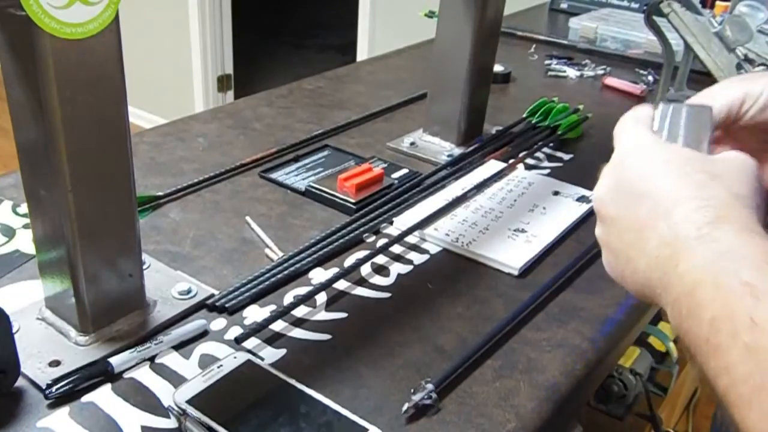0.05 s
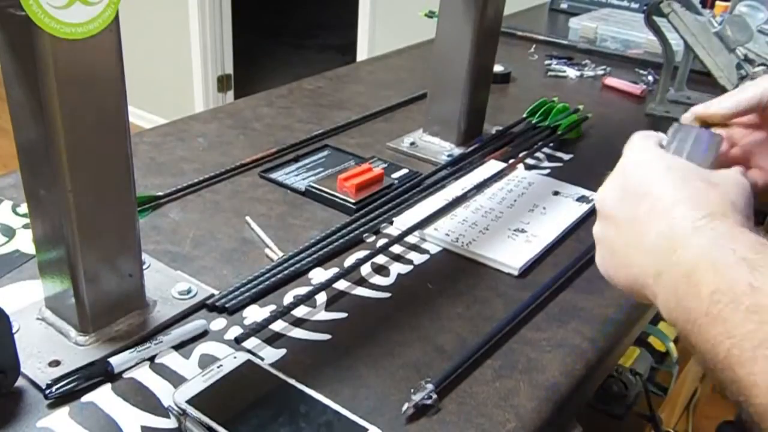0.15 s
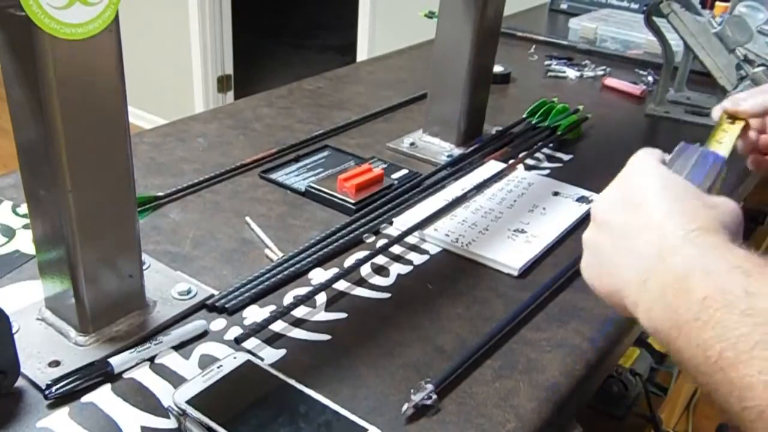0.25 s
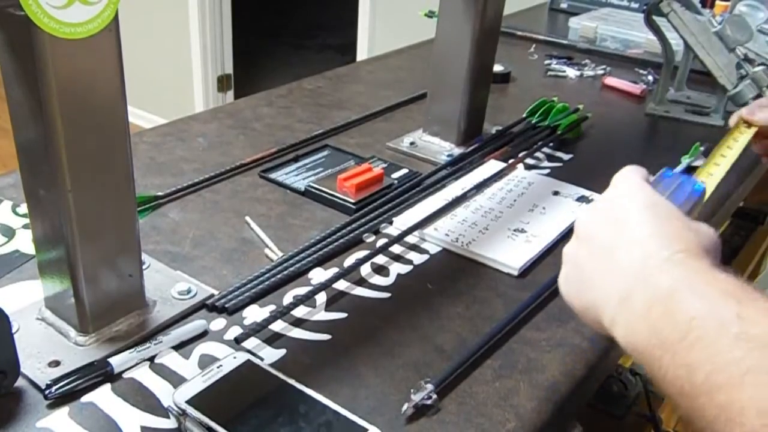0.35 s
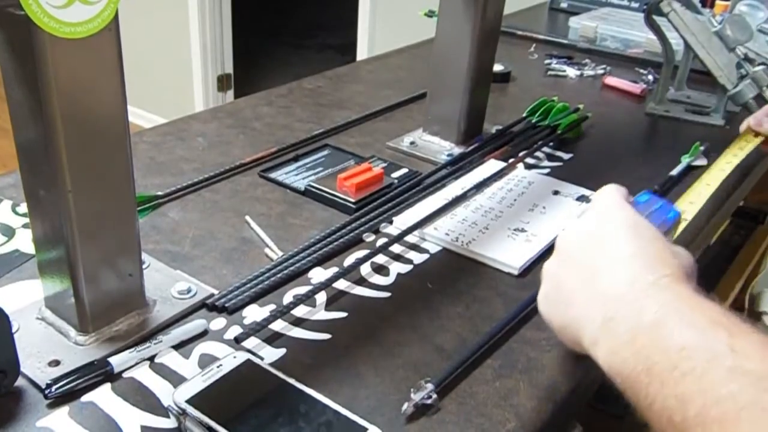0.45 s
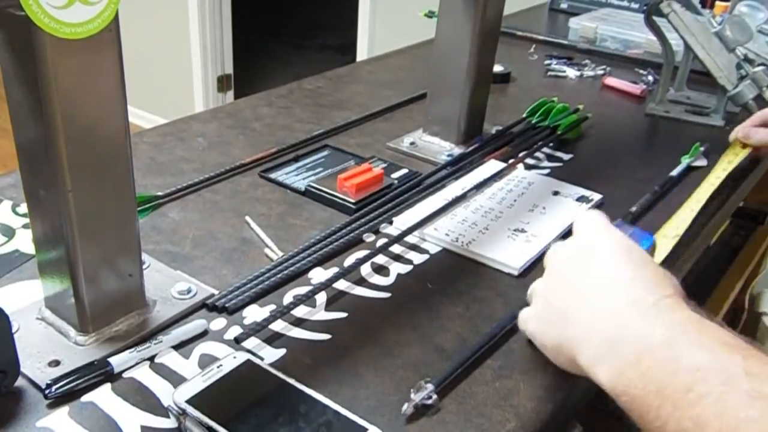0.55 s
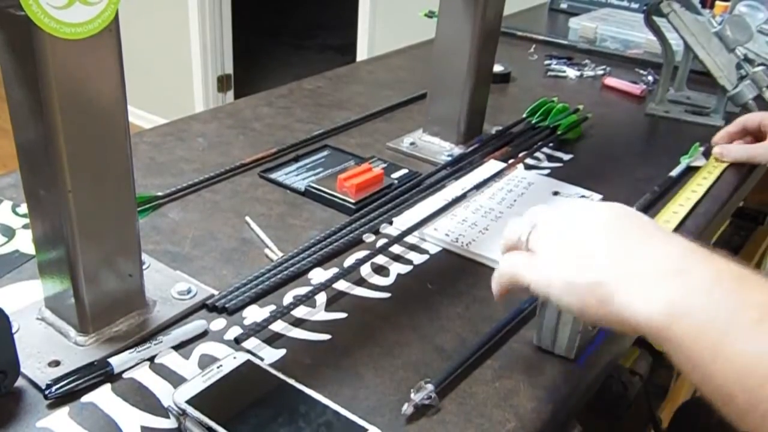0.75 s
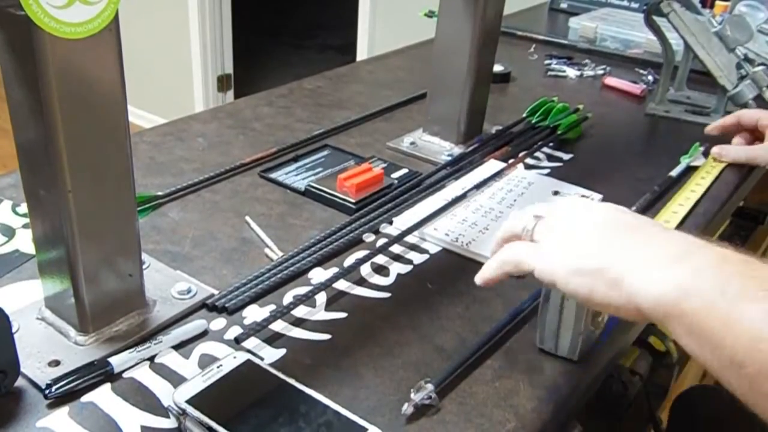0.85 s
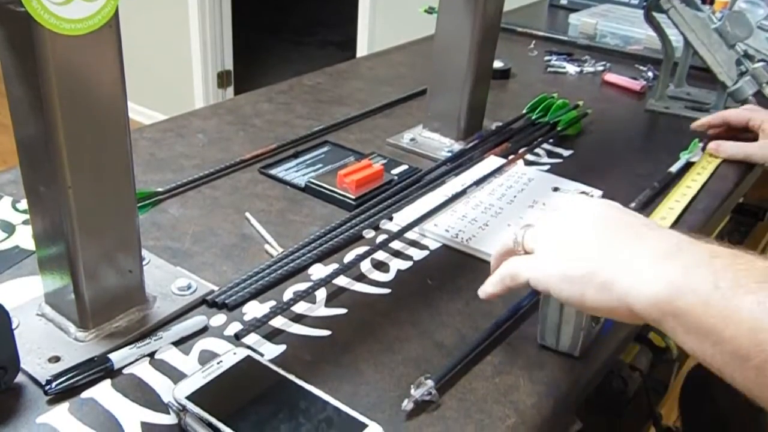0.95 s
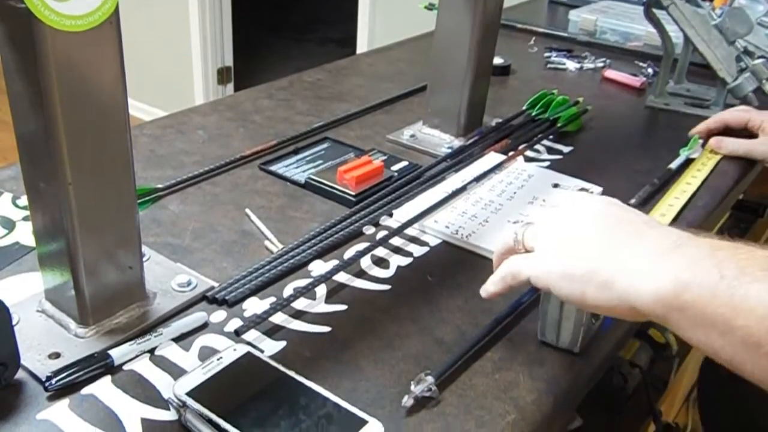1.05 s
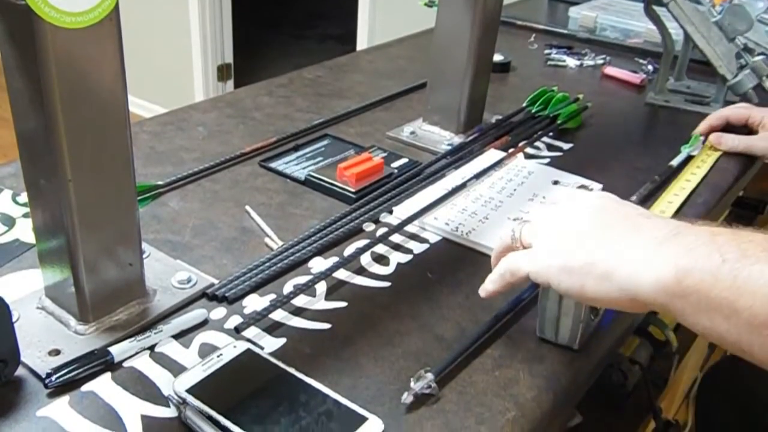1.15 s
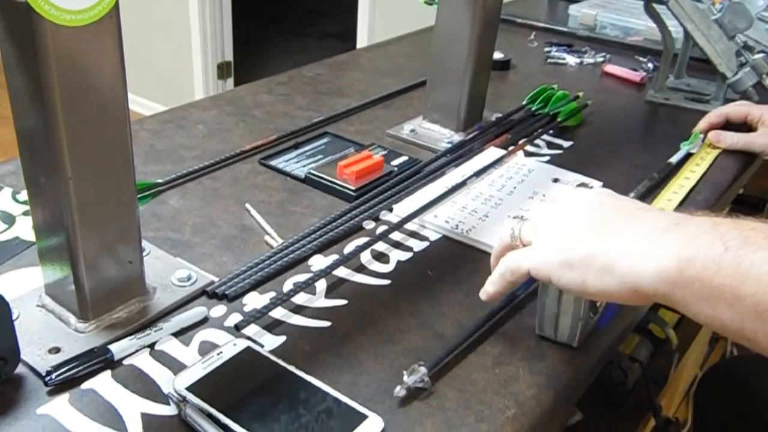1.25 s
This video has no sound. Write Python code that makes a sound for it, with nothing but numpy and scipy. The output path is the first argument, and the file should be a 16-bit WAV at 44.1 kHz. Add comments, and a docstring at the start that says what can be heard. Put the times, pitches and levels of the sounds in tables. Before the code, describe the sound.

A steel tape measure is pulled out and put down with a thump and a rattle.

```python
"""Tape measure on a workbench

A steel tape is pulled out in one rasping stroke, sticking and slipping in the mouth of its case.
The case is set down: the bench thumps and the coil rattles inside. Then the blade slaps down
beside an arrow and chatters. A few light knocks and ticks follow, all close by in a small room."""
import sys
import numpy as np
from scipy import signal
from scipy.fft import rfft, irfft
from scipy.io import wavfile
from scipy.ndimage import uniform_filter1d

SR = 44100
rng = np.random.default_rng(int(sys.argv[2]) if len(sys.argv) > 2 else 0)


def transcribe(u):
    """Save the signal u as a 16-bit wav file named by the first command-line argument.

    u: samples, shape (n,) or (channels, n), limited to [-1, 1]; the rate is SR.
    q: integer samples, one column per channel.
    """
    v = np.clip(np.atleast_2d(u).T, -1, 1)
    q = np.round(v * 32767).astype(np.int16)
    wavfile.write(sys.argv[1], SR, q)


N = 57330
T = np.arange(N) / SR
HZ = np.fft.rfftfreq(N, 1 / SR)

# Tone of the steady background noise: pitch_hz, level_db
BACKGROUND_TONE = [(25, 4), (60, -4), (200, -3.5), (500, -3.5), (1400, -6.5), (3000, -10), (8000, -13.5),
                   (12000, -15.5), (15500, -20)]
# How long the room echoes (every fade_s is the time to drop by 60 dB): pitch_hz, fade_s
ROOM_FADE = [(100, 0.55), (300, 0.36), (1000, 0.3), (3000, 0.37), (8000, 0.28), (15000, 0.15)]
# Tone of the echoes: pitch_hz, level_db
ECHO_TONE = [(100, 7.5), (300, 3), (800, 0), (2500, 0), (8000, -2.5), (15000, -2)]
# How alike scattered sound is on the left and right (1 is identical): pitch_hz, likeness
STEREO_LIKENESS = [(50, 0.93), (300, 0.99), (800, 0.91), (1600, 0.88), (3500, 0.14), (7000, 0.29),
                   (15000, 0.64)]
# The case rubs in the hand and on the bench: time_s, level_db
RUB_LEVEL = [(.18, -59), (.25, -45), (.27, -39), (.36, -46), (.46, -46.5), (.52, -56.5), (.575, -43.5),
             (.72, -44), (.79, -33), (.84, -27.5), (.89, -38.5), (.93, -36), (1.02, -67)]
# Tone of that rubbing: pitch_hz, level_db
RUB_TONE = [(25, -9), (65, -4.5), (85, -14), (115, 1), (145, -14), (190, 3), (300, -5), (500, -6.5),
            (900, -10), (1600, -14.5), (4000, -37)]
# Small ticks of the handled case: start_s, level_db, hold_s, fade_s, tilt_db_per_octave
TICK_HITS = [(.139, -34.5, 0.0024, 0.022, 5), (1.232, -42, 0.0036, 0.024, 0),
             (1.236, -31.5, 0.00074, 0.025, 0), (1.247, -44.5, 0.015, 0.086, 0.5)]
# Tone of a tick: pitch_hz, level_db
TICK_TONE = [(500, -11), (1400, -3), (2500, -7), (4200, 0), (6000, -5), (7500, -2.5), (10500, -1),
             (13000, -12), (15500, -14)]
# The turning spool drones in the case: time_s, level_db
SPOOL_LEVEL = [(.25, -60), (.28, -41), (.305, -34), (.335, -37), (.36, -54), (.4, -64)]
# Notes of that drone: pitch_hz, waver_hz, level_db
SPOOL_NOTES = [(116, 14, -5), (376, 14, 0)]
# The coil rattles in the case: start_s, level_db, hold_s, fade_s
COIL_HITS = [(.576, -36.5, .008, .02), (.584, -23.5, .016, .03), (.603, -17, 0.0037, 0.12),
             (.622, -7.5, 0.0043, 0.019), (.642, -20.5, 0.021, 0.096), (.661, -24, .017, 0.099),
             (.73, -39.5, 0.035, 0.024)]
# Tone of the rattle: pitch_hz, level_db
COIL_TONE = [(800, -34), (2000, -14), (3100, -13.5), (3850, -8), (4050, -2.5), (4300, -9.5), (5300, -1),
             (6200, -3.5), (7600, 2), (9400, -0.5), (11500, -3.5), (12500, -9.5), (15500, -14)]
# The blade slaps down and chatters: start_s, level_db, hold_s, fade_s
BLADE_HITS = [(.766, -7, 0.0057, 0.011), (.772, -13.5, 0.062, 0.29), (.7885, -5.5, .001, 0.0072),
              (.805, -25, .001, .01)]
# Tone of the slaps: pitch_hz, level_db
BLADE_TONE = [(300, -53), (550, -21.5), (950, -12), (1350, -22), (1850, -7.5), (2600, -9.5), (3100, -12),
              (4000, -8), (5500, -6.5), (6800, -7.5), (7900, 0), (9200, -4), (10700, -7), (12000, -15),
              (14400, -16.5), (15500, -37)]
# Notes the steel blade rings with: pitch_hz, level_db, fade_s
BLADE_NOTES = [(1998, 17.5, 0.012), (2410, 0.5, .08), (4240, -1, 0.071), (5052, -23, 0.15),
               (7500, 10, 0.11), (7450, -8, 0.19), (8100, -9, 0.074), (8040, -4.5, 0.136),
               (8080, -4.5, 0.066), (7740, -12.5, 0.1), (9300, 7, .15), (10570, -14, 0.22)]
# The case knocks on the bench: start_s, thump_db, clack_db, clack_pitch_hz, clack_width_octaves
CASE_KNOCKS = [(.259, -49, -34.5, 840, 0.34), (0.441, -38, -28, 750, 0.62), (0.585, -1, -9, 614, 0.89),
               (0.5989, -14, -19.5, 330, 2), (.63, -18, -16, 810, 0.22), (.654, -24, -26, 800, 1.1),
               (.665, -19.5, -21.5, 495, 1), (0.675, -33, -21.5, 750, 0.73), (.876, -22.5, -29, 400, 0.87),
               (0.887, -26, -27, 504, 2.6), (1.138, -56, -35, 428, 0.52), (1.159, -53, -45, 432, 0.51),
               (1.194, -50, -57, 348, 1.4)]
# Notes the bench rings with: pitch_hz, level_db, fade_s
BENCH_NOTES = [(121, -14, 0.19), (191.7, -5.5, 0.15), (205.2, -4, 0.07), (289.5, -4.5, 0.065),
               (302.6, -1.5, 0.12), (365, -13, 0.096), (433, -15.5, 0.2), (492, -19.5, .15),
               (750, -23, 0.37), (826, -15.5, 0.24), (1028, -31, 0.16), (1335, -28, 0.28)]
# The rasp follows the pull on the blade: time_s, level_db
PULL_LEVEL = [(0, -53.5), (.068, -66), (.078, -52), (.115, -45.5), (.13, -58), (.165, -58.5), (.193, -36.5),
              (.203, -28), (.23, -29), (.32, -32), (.41, -29.5), (.455, -30), (.49, -41), (.54, -46.5),
              (.58, -55.5)]
# The turning spool bumps, jolting the rasp: start_s, level_db, hold_s, fade_s
SPOOL_BUMPS = [(.212, -26.5, 0.012, 0.016), (.238, -17.5, 0.0048, 0.01), (.274, -23.5, 0.011, .015),
               (.299, -17, 0.0027, 0.022), (.335, -26, 0.01, 0.05), (.373, -23, 0.012, .025),
               (.406, -38, 0.0033, .015), (.439, -49, 0.0016, 0.011)]
# Tone of the rasp: pitch_hz, level_db
RASP_TONE = [(290, -30.5), (500, -8), (611, -13), (815, -12), (1310, -15), (2040, -7), (2760, -5.5),
             (4070, 0.5), (6640, -6.5), (7560, -3), (10100, -9.5), (11000, -6.5), (12500, -16.5),
             (14800, -20.5), (15500, -26)]


def amp(db):
    """Turns decibels into a number to multiply by."""
    return 10 ** (np.asarray(db) / 20)


def unit(x):
    """Scales a signal to an average (rms) strength of 1."""
    return x / np.sqrt(np.mean(x ** 2) + 1e-20)


def fade(time_s, fade_s):
    """Dies away by 60 dB every fade_s seconds."""
    return np.exp(-np.log(1000) * time_s / fade_s)


def by_pitch(points, hz=HZ):
    """Joins a table's points smoothly along a musical (log) pitch scale."""
    pitches, values = np.transpose(points)
    return np.interp(np.log(hz + 1), np.log(pitches + 1), values)


def level(points):
    """Loudness that follows a table over time, silent before and after."""
    return amp(np.interp(T, *np.transpose(points), left=-np.inf, right=-np.inf))


def convolve(x, response):
    """Lets every sample of x set off the response, cut to the scene's length."""
    return signal.fftconvolve(x, response)[:N]


def colour(x, tone_db):
    """Gives x a tone with a filter of energy 1 that never sounds ahead of its input."""
    log_gain = np.log(amp(tone_db))
    mirrored = np.r_[log_gain, log_gain[-2:0:-1]]
    response = np.fft.ifft(np.exp(np.conj(signal.hilbert(mirrored)))).real[:4096]
    return convolve(x, response / np.linalg.norm(response))


def ring(notes):
    """A struck object rings with several pure notes that die away."""
    return sum(amp(db) * fade(T, fade_s) * np.sin(2 * np.pi * hz * T) for hz, db, fade_s in notes)


def grains(per_s, spread_db):
    """A dense stream of tiny contacts of uneven size, kept at a steady loudness."""
    chance, size, sign = rng.random(N), rng.exponential(1, N), rng.choice([-1, 1], N)
    stream = sign * amp(spread_db * np.minimum(size, 3)) * (chance < per_s / SR)
    return stream / np.sqrt(abs(uniform_filter1d(stream ** 2, size=260)) + 1e-6)


def bursts(hits, rise_s):
    """Loudness of hits that each rise, hold and die away."""
    power = 0
    for start_s, db, hold_s, fade_s in hits:
        rise = np.clip((T - start_s) / rise_s, 0, 1)
        fall = fade(np.maximum(T - start_s - hold_s, 0), fade_s)
        power += (amp(db) * rise * fall) ** 2
    return np.sqrt(power)


def note(start_s, pitch_hz, level_db, rise_s, fade_s):
    """One pure note that swells and dies away."""
    return bursts([(start_s, level_db, 0, fade_s)], rise_s) * np.sin(2 * np.pi * pitch_hz * (T - start_s))


def diffuse(pair):
    """Makes two unrelated signals alike in the bass, as at two close microphones."""
    a, b = rfft(pair)
    likeness = by_pitch(STEREO_LIKENESS)
    mid, side = a * np.sqrt((1 + likeness) / 2), b * np.sqrt((1 - likeness) / 2)
    return irfft([mid + side, mid - side], N)


def room(x, tail_db, early_db=-20, left_lag_ms=0):
    """The direct sound, quick echoes off tools and posts on the bench, and the room's echo tail."""
    taps = diffuse(rng.choice([-1., 1.], (2, N)) * (rng.random((2, N)) < 6000 / SR))
    hz, time_s, bands = signal.stft(taps, SR, nperseg=256)
    bands *= fade(time_s, by_pitch(ROOM_FADE, hz)[:, None])
    tail = signal.istft(bands, SR, nperseg=256)[1][:, :N] * (T > .0047)
    early = taps[:, ::-1] * fade(T, fade_s=.027) * (T > .0005)
    echoes = sum(amp(db) * part / np.linalg.norm(part, axis=1, keepdims=True)
                 for db, part in [(tail_db, tail), (early_db, early)])
    echoes = irfft(rfft(echoes) * amp(by_pitch(ECHO_TONE)), N)[:, :N // 2]
    left = irfft(rfft(x) * np.exp(-2j * np.pi * HZ * left_lag_ms / 1000), N)
    return np.array([left, x]) + np.array([convolve(x, side) for side in echoes])


def background(level_db=-52):
    """Steady room noise and microphone hiss."""
    noise = diffuse(rng.standard_normal((2, N)))
    return amp(level_db) * unit(irfft(rfft(noise) * amp(by_pitch(BACKGROUND_TONE)), N))


def case_rubbing():
    """The case rubs against the hand and the bench with a dull rumble."""
    friction = grains(per_s=3000, spread_db=1.3) * level(RUB_LEVEL)
    return room(colour(friction, by_pitch(RUB_TONE)), tail_db=-20.5)


def finger_ticks():
    """Light ticks as the fingers shift on the case."""
    ticks = 0
    for *hit, tilt in TICK_HITS:
        contacts = grains(per_s=3000, spread_db=6.3) * bursts([hit], rise_s=.00061)
        ticks += colour(contacts, by_pitch(TICK_TONE) + tilt * np.log2(HZ / 5000 + 1e-2))
    return room(ticks, tail_db=-4, early_db=-7, left_lag_ms=.03)


def spool_drone():
    """The turning spool rubs the case, which hums with two low, wavering notes."""
    drone = 0
    for hz, waver_hz, db in SPOOL_NOTES:
        waver = unit(uniform_filter1d(rng.standard_normal(N), size=500))
        drone += amp(db) * np.sin(2 * np.pi * np.cumsum(hz + waver_hz * waver) / SR)
    return room(drone * level(SPOOL_LEVEL), tail_db=-14)


def release_tap():
    """The blade breaks free with a short, hollow tap in the case."""
    return room(note(start_s=.197, pitch_hz=430, level_db=-27, rise_s=.003, fade_s=.06), tail_db=-14)


def bench_hum():
    """The settling case sets one low note of the bench humming."""
    return room(note(start_s=.657, pitch_hz=193, level_db=-19, rise_s=.0027, fade_s=.32), tail_db=-18)


def coil_rattle():
    """The wound steel rattles inside the case as it lands."""
    contacts = grains(per_s=9000, spread_db=3.3) * bursts(COIL_HITS, rise_s=.00066)
    rattle = colour(contacts, by_pitch(COIL_TONE))
    return amp(-.5) * room(rattle, tail_db=-1, early_db=0, left_lag_ms=.035)


def blade_slap(ring_db=-14):
    """The pulled-out blade slaps down and chatters, which makes its thin steel ring."""
    contacts = grains(per_s=12000, spread_db=1.7) * bursts(BLADE_HITS, rise_s=.0014)
    ringing = convolve(contacts, ring(BLADE_NOTES))
    ringing *= np.linalg.norm(contacts) / np.linalg.norm(ringing)
    slaps = colour(contacts, by_pitch(BLADE_TONE))
    return room(slaps + amp(ring_db) * ringing, tail_db=-7, early_db=-6)


def case_knocks(thump_rise_s=.0024, low_cut_hz=95, clack_fade_s=.04, scrape_db=-1.5):
    """Each knock thumps the bench top and draws a short, hollow clack from the plastic case."""
    thump = ring(BENCH_NOTES) * (1 - np.exp(-T / thump_rise_s))
    broad_tone = amp(-16.5) / np.hypot(1, HZ / 2000) * HZ / (HZ + 400)
    thumps, clacks = np.zeros(N), np.zeros(N)
    for start_s, thump_db, clack_db, pitch_hz, octaves in CASE_KNOCKS:
        start = round(start_s * SR)
        thumps[start:] += amp(thump_db) * thump[:N - start]
        force = bursts([(start_s, 0, 0, clack_fade_s)], rise_s=.00019)
        contacts = amp(scrape_db) * grains(per_s=8000, spread_db=5.9) * force
        contacts[start] += np.linalg.norm(force)  # one sharp blow leads the scraping
        hollow_tone = np.exp(-.5 * (np.log2((HZ + 1) / pitch_hz) / octaves) ** 2)
        clack = colour(contacts, 20 * np.log10(hollow_tone + broad_tone + 1e-4))
        clacks += amp(clack_db) * clack * np.linalg.norm(force) / np.linalg.norm(clack)
    thumps = signal.sosfilt(signal.butter(3, low_cut_hz, "highpass", fs=SR, output="sos"), thumps)
    return room(thumps, tail_db=-17) + room(clacks, tail_db=-.5, early_db=.5)


def tape_rasp():
    """The blade sticks and slips through the mouth of the case, jolted now and then by the turning spool."""
    force = np.hypot(level(PULL_LEVEL), bursts(SPOOL_BUMPS, rise_s=.0023))
    slips = grains(per_s=9000, spread_db=4) * force
    return room(colour(slips, by_pitch(RASP_TONE)), tail_db=-4.5, early_db=.5, left_lag_ms=.018)


def scene():
    """All the sounds together, a touch louder on the left."""
    pulling = release_tap() + tape_rasp() + spool_drone()
    setting_down = case_rubbing() + case_knocks() + bench_hum() + coil_rattle() + blade_slap()
    return (pulling + setting_down + finger_ticks() + background()) * amp([[.3], [-.3]])


def record(dry):
    """Clips peaks at full scale, then removes the treble above 15750 Hz."""
    treble_cut = signal.firwin(511, 15750, window=("kaiser", 9), fs=SR)
    return signal.oaconvolve(np.clip(dry, -1, 1), treble_cut[None], "same")


dry = scene()
out = record(dry)
transcribe(out)
```